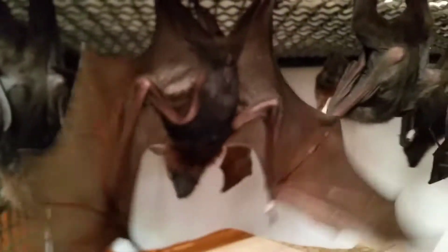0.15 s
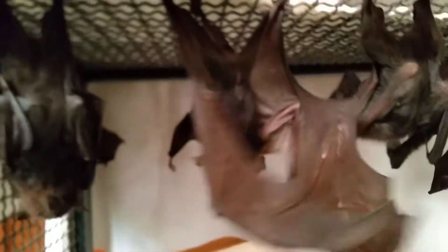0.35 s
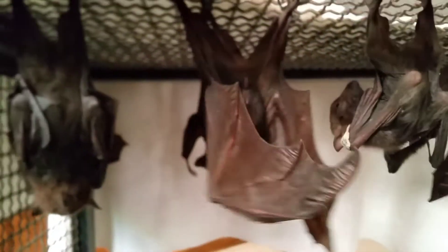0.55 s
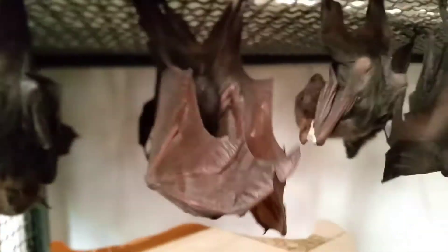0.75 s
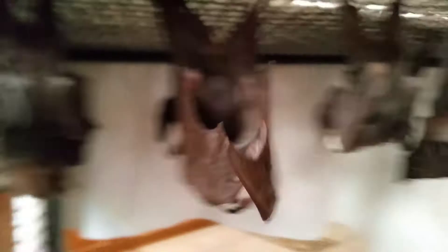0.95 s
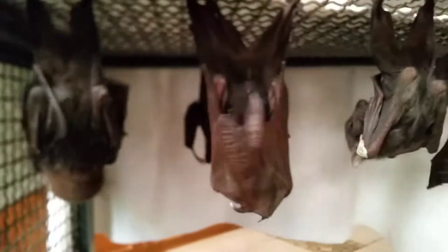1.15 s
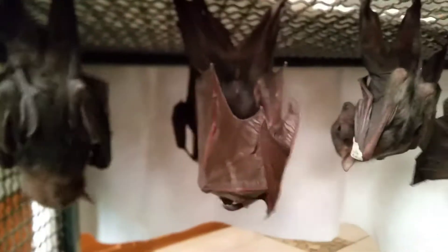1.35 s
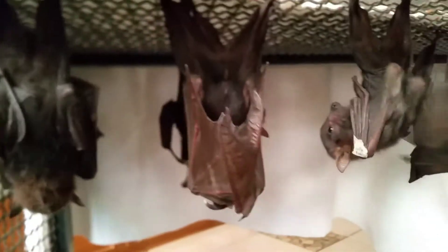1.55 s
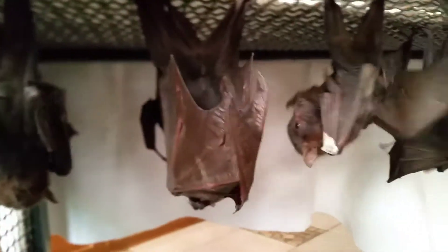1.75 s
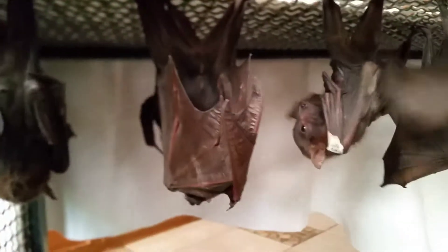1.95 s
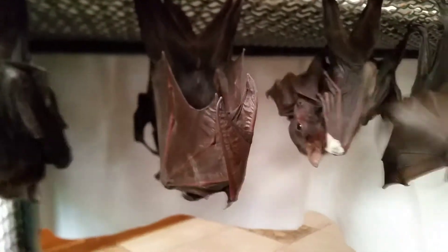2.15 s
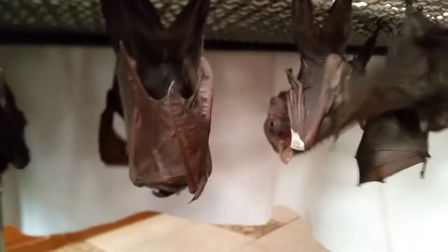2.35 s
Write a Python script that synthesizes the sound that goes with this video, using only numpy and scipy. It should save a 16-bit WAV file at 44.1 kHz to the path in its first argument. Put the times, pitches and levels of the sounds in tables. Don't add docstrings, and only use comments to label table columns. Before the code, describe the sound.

Shrill bat screeches and rapid chattering trills, a wing swish and wire knock, over steady fan hum

```python
import sys
import numpy as np
from scipy import signal
from scipy.io import wavfile
from scipy.ndimage import uniform_filter1d

SR = 44100
rng = np.random.default_rng(int(sys.argv[2]) if len(sys.argv) > 2 else 0)


def output_pcm(signal):
    pcm = np.clip(np.atleast_2d(signal).T, -1, 1) * 32767
    wavfile.write(sys.argv[1], SR, np.round(pcm).astype(np.int16))


def gain_from_decibels(decibels):
    exponent = np.asarray(decibels, float) / 20
    return 10 ** exponent


N = 105840


def evened(x):
    return x / np.sqrt(np.mean(x ** 2) + 1e-20)


def read(points, hz):
    point_hz, value = np.transpose(points)
    return np.interp(np.log(hz + 1), np.log(point_hz + 1), value)


def add(mix, start_s, sound):
    part = mix[round(start_s * SR):][:len(sound)]
    part += sound[:len(part)]


def resonate(x, centre_hz, width_hz):
    carrier = np.exp(2j * np.pi * np.cumsum(centre_hz * np.ones(len(x))) / SR)
    pole = np.exp(-np.pi * width_hz / SR)
    base = signal.lfilter([(1 - pole) ** 2], [1, -2 * pole, pole * pole], x / carrier + 1e-18)
    return 2 * (carrier * base).real


def ring(t, level_db, ring_hz, t60_s):
    return gain_from_decibels(level_db - 60 * t / t60_s) * np.sin(2 * np.pi * ring_hz * t)


def room(x):
    # hz, t60_s
    wall_decay = [(1000, .4), (3000, .42), (5300, .35), (10000, .32), (15000, .3)]
    length, spacing = SR // 2, 10
    taps = np.zeros((2, length))
    slots = np.arange(100, length - spacing, spacing)
    at = slots + rng.integers(0, spacing, (2, (length - 101) // spacing))
    np.put_along_axis(taps, at, rng.choice([-1., 1.], at.shape), 1)
    hz, t, spectrum = signal.stft(taps, SR, nperseg=128)
    decay = gain_from_decibels(-60 * t / read(wall_decay, hz)[:, None])
    tail = signal.istft(spectrum * decay, SR, nperseg=128)[1]
    return signal.fftconvolve(x, tail / np.linalg.norm(tail[0]), axes=1)[:, :N]


def air():
    # hz, density_db_per_hz
    air_spectrum = [(30, -14), (50, -3), (200, -3), (430, -8), (680, -2.5), (1100, -17), (2300, -17),
                    (3700, -30), (16000, -43)]
    # hz, correlation
    likeness = [(60, .95), (300, .88), (640, .75), (1100, -.1), (1500, -.3), (3000, 0)]
    # centre_hz, rms_db, width_hz
    hum_bands = [(100, -63, 6), (200, -61, 10)]
    frames, hz = N // 256 + 5, np.fft.rfftfreq(1024, 1 / SR)
    a, b, c, d, patches = rng.standard_normal((frames, 513, 5)).T
    patches = uniform_filter1d(uniform_filter1d(patches, 10, 0), 12, 1)
    same = np.clip(read(likeness, hz), -1, 1)[:, None]
    left = a + 1j * b
    right = same * left + np.sqrt(1 - same ** 2) * (c + 1j * d)
    gain = gain_from_decibels(read(air_spectrum, hz)[:, None] + 1.2 * evened(patches)) / np.sqrt(1 + same)
    wash = signal.istft(np.array([left, right]) * gain, nperseg=1024, noverlap=768)[1][:, :N]
    wash = gain_from_decibels(-48) * wash / np.std(wash.mean(0))
    hum = sum(gain_from_decibels(rms_db) * evened(resonate(rng.standard_normal(N), centre_hz, width_hz))
              for centre_hz, rms_db, width_hz in hum_bands)
    whine_hz, whine_rms_db = 795, -62
    whine = gain_from_decibels(whine_rms_db + 3) * np.sin(2 * np.pi * whine_hz * np.arange(N) / SR)
    return wash + hum + whine


def wing():
    # time_s, centre_hz, level_db
    swish_path = [
        (1.27, 3300, -66),
        (1.32, 2900, -51),
        (1.38, 2300, -46),
        (1.44, 1800, -46),
        (1.5, 1600, -47),
        (1.57, 950, -51),
        (1.68, 900, -68),
    ]
    # start_s, level_db, ring_hz, t60_s, left_over_right_db
    knocks = [(1.492, -27, 1200, .03, 4), (1.4925, -30, 1650, .06, 2), (1.4922, -30, 2400, .01, 2),
              (1.493, -33, 800, .015, 3), (1.5, -44, 950, .3, 2), (1.492, -44, 180, .08, 0),
              (1.305, -45, 4400, .015, 2), (1.306, -45, 7000, .012, 2), (1.09, -44, 200, .12, 0),
              (1.313, -48, 7400, .01, 2), (1.24, -50, 5700, .03, 2)]
    time_s, path_hz, path_db = np.transpose(swish_path)
    t = np.arange(N) / SR
    centre_hz = np.interp(t, time_s, path_hz)
    swish = [evened(resonate(noise, centre_hz, 1000)) for noise in rng.standard_normal((2, N))]
    out = np.array(swish) * gain_from_decibels(np.interp(t, time_s, path_db, -120, -120))
    for start_s, level_db, ring_hz, t60_s, pan_db in knocks:
        knock = ring(t[:SR // 4], level_db, ring_hz, t60_s)
        add(out[0], start_s, knock * gain_from_decibels(pan_db / 2))
        add(out[1], start_s + .0003, knock * gain_from_decibels(-pan_db / 2))
    return out + gain_from_decibels(-5) * room(out)


def clicks():
    # start_s, level_db
    click_times = [
        (2.3776, -33),
        (2.38, -31),
        (2.3822, -31),
    ]
    # ring_hz, level_db, t60_s
    mouth_modes = [(5500, 0, .008), (9200, -3, .006), (15500, -14, .004), (12000, -16, .004)]
    t = np.arange(1000) / SR
    click = sum(ring(t, level_db, ring_hz, t60_s) for ring_hz, level_db, t60_s in mouth_modes)
    out = np.zeros(N)
    for start_s, level_db in click_times:
        add(out, start_s, gain_from_decibels(level_db) * click)
    out = out * gain_from_decibels([[3], [-3]])
    return out + gain_from_decibels(-8) * room(out)


def syllable(length_s, level_db, top_hz, mouth, throat, rough, arch, jitter):
    u = np.linspace(0, 1, round(length_s * SR))
    wobble, hiss, lumps = rng.standard_normal((3, 4096))[:, :len(u)]
    shut = (2 * u ** 1.15 - 1) ** 2
    wobble = evened(uniform_filter1d(wobble, size=60))
    turns = np.cumsum(top_hz * (1 - arch * shut) * (1 + jitter * wobble)) / SR
    pulses = sum(np.cos(2 * np.pi * k * turns + .08 * k * k) for k in range(2, round(SR / 2.4 / top_hz)))
    gated_hiss = (.4 + np.exp(-(turns % 1) / .3)) * hiss
    drive = (1 - rough) * evened(pulses) + rough * evened(gated_hiss)

    rise, fall = .33, .5
    shape = np.sin(np.pi / 2 * np.clip(np.minimum(u / rise, (1 - u) / fall), 0, 1))
    effort = evened(uniform_filter1d(uniform_filter1d(lumps, size=130), size=90))
    shape = shape * gain_from_decibels(1.1 * effort)
    out = 0
    for k, (centre_hz, width_hz, band_db, pan_db, sweep) in enumerate(throat):
        band = evened(resonate(drive, centre_hz * mouth * (1 - sweep * shut), width_hz))
        out = out + (-1) ** k * gain_from_decibels(band_db) * gain_from_decibels([[pan_db / 2], [-pan_db / 2]]) * band
    return gain_from_decibels(level_db) * shape * evened(out)


def bat(calls, throat, rough, arch, jitter, left_lag_s, room_db):
    # delay_s, level_db
    near_echoes = [(.0011, -5), (.0023, -7), (.0037, -8), (.0058, -9)]
    out = np.zeros((2, N))
    for start_s, *call in calls:
        left, right = syllable(*call, throat, rough, arch, jitter)
        add(out[0], start_s + max(left_lag_s, 0), left)
        add(out[1], start_s + max(-left_lag_s, 0), right)
    near = np.zeros((2, N))
    for delay_s, level_db in near_echoes:
        near[0] += gain_from_decibels(level_db) * np.roll(out[0], round(delay_s * SR))
        near[1] -= gain_from_decibels(level_db) * np.roll(out[1], round(1.3 * delay_s * SR))
    return out + near + gain_from_decibels(room_db) * room(out)



def puffs():
    puff_calls = [
        (1.31, .04, -60, 700, 1.1),
        (1.684, .03, -54, 700, 1.0),
        (1.706, .034, -38, 680, 1.0),
        (2.372, .01, -52, 700, 1.0),
    ]
    puff_throat = [(4300, 1800, -5, -1, .03), (6000, 2000, 0, -2, .03), (9000, 3000, -3, -4, .03),
                   (12000, 3000, -1, -4, .03), (15000, 2500, -1, -3, .02)]
    return bat(puff_calls, puff_throat, rough=.85, arch=.03, jitter=.1, left_lag_s=-.0001, room_db=-3)


def second_trill():
    again_calls = [
        (1.737, .04, -30, 660, 1.01),
        (1.784, .036, -28.5, 668, 1.03),
        (1.824, .036, -31.5, 675, 1.05),
        (1.874, .045, -34, 660, 1.0),
        (1.922, .042, -33.5, 655, .98),
        (1.968, .042, -31.5, 655, 1.0),
        (2.02, .044, -30.5, 652, .98),
        (2.068, .042, -31.5, 648, .97),
        (2.114, .035, -38, 640, .95),
    ]
    again_throat = [(3700, 2200, -21, -2, .03), (4800, 900, -22, -2, .05), (5700, 800, -5, -1, .05),
                    (7000, 1100, -9, -5, .06), (8400, 1500, -16, -4, .04), (10000, 1400, -7, -5, .05),
                    (11700, 1400, -1, -7, .16), (14500, 2600, -11, -7, .04)]
    return bat(again_calls, again_throat, rough=.42, arch=.07, jitter=.022, left_lag_s=.0001, room_db=2.5)


def first_trill():
    trill_calls = [(.4, .025, -34, 645, .94), (.424, .04, -29, 662, .98), (.471, .036, -30, 670, .99),
                   (.508, .044, -30, 682, 1.0), (.559, .044, -31, 686, 1.02),
                   (.607, .042, -28.5, 682, 1.01), (.652, .04, -29.5, 676, 1.0), (.71, .036, -29, 668, 1.0),
                   (.75, .024, -29, 655, .97), (.772, .036, -30.5, 648, .98), (.816, .02, -39, 640, .97)]
    trill_throat = [(3600, 2400, -24, -1, .03), (6400, 750, 0, -2.5, .025), (8300, 2000, -18, -4, .03),
                    (10500, 1100, -6, -7, .04), (12300, 1600, -4, -7, .18), (14200, 2000, -12, -5, .05)]
    return bat(trill_calls, trill_throat, rough=.36, arch=.04, jitter=.013, left_lag_s=-.0001, room_db=1.5)


def rasps():
    rasp_calls = [(.232, .016, -26, 800, 1.03), (.226, .045, -33, 800, .95), (.272, .01, -31, 800, 1.0),
                  (.28, .04, -38, 800, .72), (.325, .045, -39, 800, .68), (.69, .022, -33, 750, 1.2),
                  (.788, .018, -39, 700, .76), (.377, .03, -33, 700, .8), (.688, .035, -35, 750, .9),
                  (1.016, .015, -28, 780, .97), (1.012, .045, -34, 780, .95), (1.35, .016, -30, 820, .95),
                  (1.342, .045, -34, 820, .95), (2.386, .013, -50, 800, .85)]
    rasp_throat = [(3000, 1500, -21, 0, .05), (4300, 1400, -11, 0, .05), (6200, 1400, -1, 1, .05),
                   (9500, 2400, 0, 1, .08), (14800, 2400, -11, 1, .05)]
    return bat(rasp_calls, rasp_throat, rough=.8, arch=.05, jitter=.2, left_lag_s=-.0002, room_db=-3.5)


def screeches():
    screech_calls = [(.27, .044, -25.5, 900, 1.03), (.318, .05, -26.5, 850, .97),
                     (.376, .03, -30, 720, .92), (.69, .04, -30, 760, 1.0), (.743, .035, -31, 700, .95),
                     (1.058, .042, -22, 1050, 1.05), (1.095, .05, -29, 800, .94),
                     (1.143, .022, -34, 800, .95), (1.168, .016, -34, 760, .9),
                     (1.386, .038, -23, 1080, 1.06), (1.436, .044, -22, 1000, .95),
                     (1.474, .016, -30, 900, .92), (1.496, .011, -27, 900, .9)]
    screech_throat = [(2700, 2000, -27, 1, .05), (4000, 1600, -20, 1, .05), (5100, 800, -17, 1, .06),
                      (6150, 850, 0, 2.5, .08), (8000, 1800, -12, 1, .06), (10600, 1500, -3.5, -1, .12),
                      (12800, 2200, -5, 1, .08), (15200, 2200, -10, 3, .03)]
    return bat(screech_calls, screech_throat, rough=.34, arch=.09, jitter=.02, left_lag_s=-.0004,
               room_db=-4.5)


def scene():
    background = air() + wing() + clicks()
    right_bat = first_trill() + second_trill()
    near_bat = puffs() + rasps() + screeches()
    return background + right_bat + near_bat


def top_cut(x):
    return signal.sosfilt(signal.butter(12, 16450, fs=SR, output="sos"), x)


def record(dry):
    bass_cut = signal.butter(2, 32, "high", fs=SR, output="sos")
    band_limit = signal.firwin(1023, 15850, window=("kaiser", 9), fs=SR)
    mix = signal.oaconvolve(signal.sosfilt(bass_cut, dry), band_limit[None], "same")
    return top_cut(mix)


dry = scene()
out = record(dry)
output_pcm(out)
```